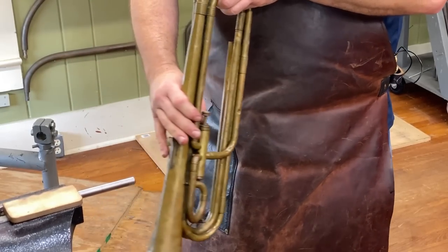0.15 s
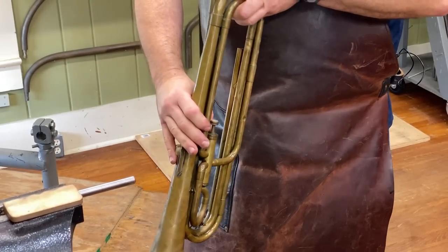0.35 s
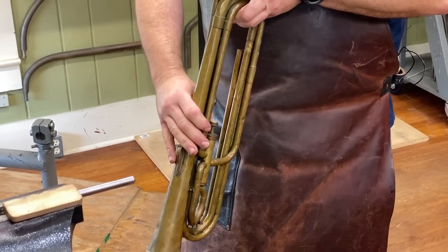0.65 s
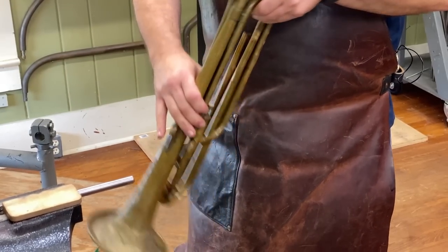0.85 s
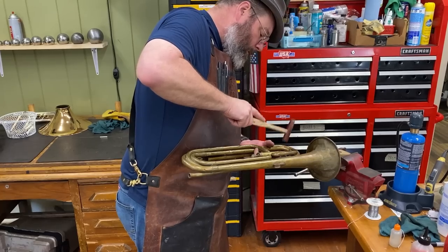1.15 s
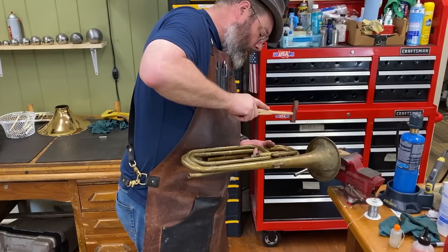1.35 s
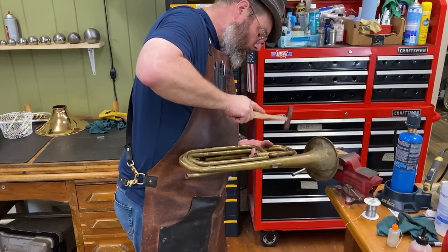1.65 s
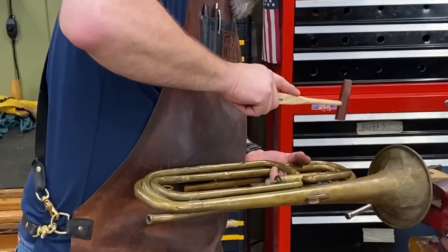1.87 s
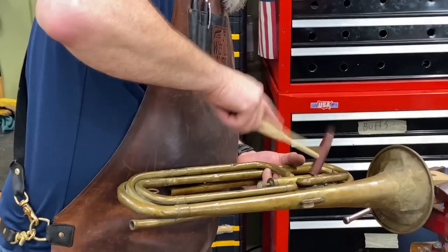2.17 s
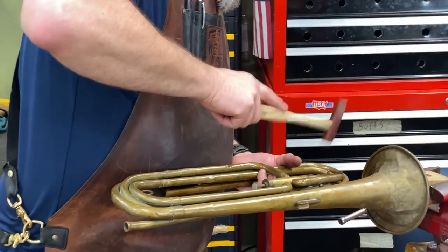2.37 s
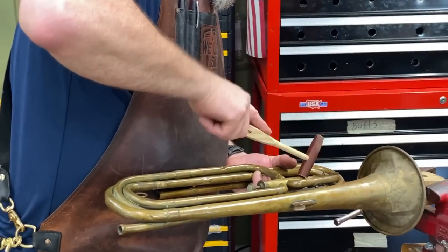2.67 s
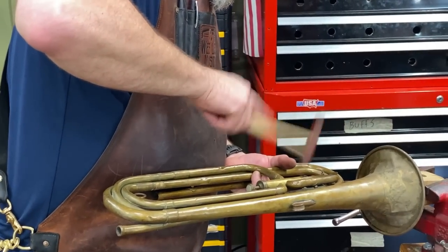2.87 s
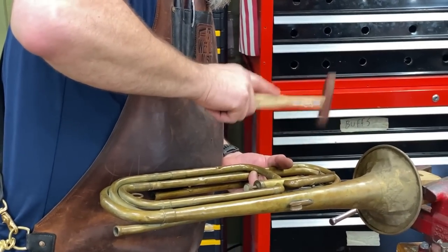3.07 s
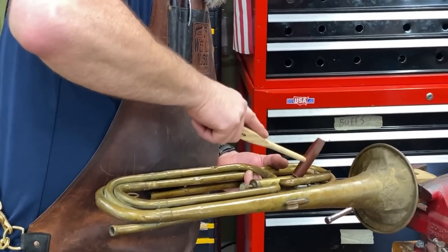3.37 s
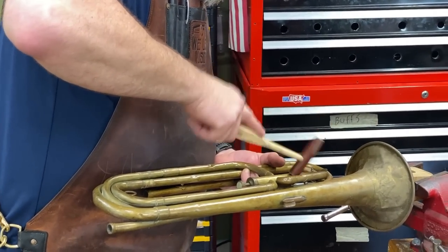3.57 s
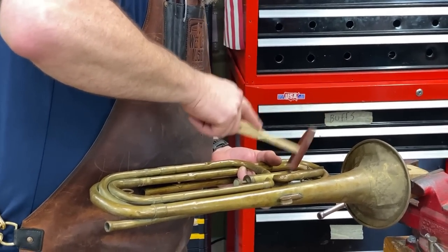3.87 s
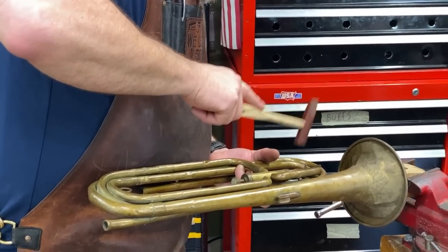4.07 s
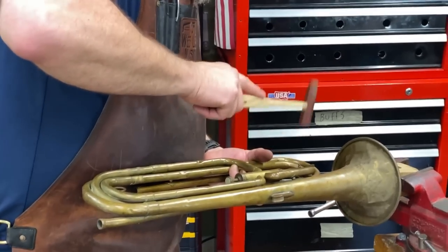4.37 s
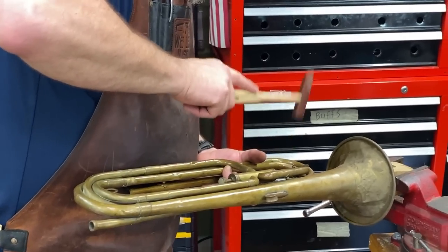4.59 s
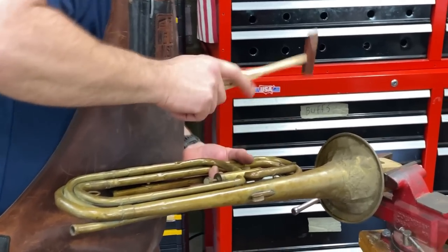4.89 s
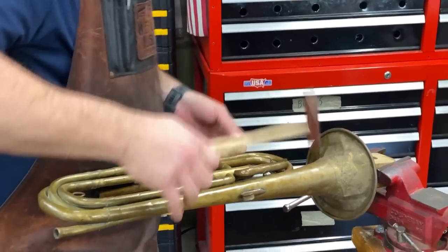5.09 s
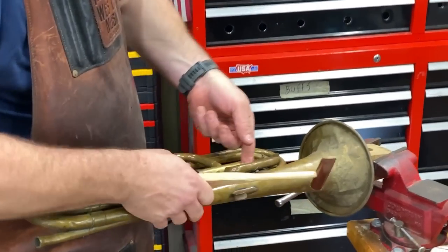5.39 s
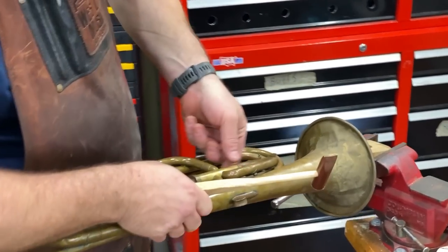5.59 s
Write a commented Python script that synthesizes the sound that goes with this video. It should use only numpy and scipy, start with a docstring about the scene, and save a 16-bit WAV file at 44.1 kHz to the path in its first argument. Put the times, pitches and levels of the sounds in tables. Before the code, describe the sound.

Close up in a small workshop, a mallet taps once softly on brass tubing, then hammers it twelve times in an even, quick rhythm. The hard, slightly distorted knocks ring only briefly in the room. Three more come after a brief gap. At the end, hands move the horn with dull bumps and small squeaks, a leather apron rustles and the jolted microphone gives a low rumble.

```python
"""Faint rustle and skin squeaks in a small workshop, then a mallet tries a hand-held brass horn, close up.
Twelve sharp blows follow, a pause, and three more. Each knocks the damped tubing, cracks in the
thin wall, rings briefly in the room and overloads the input. Then the horn is shifted in the hands:
soft bumps, finger ticks, the rustle of a leather apron and the low rumble of the jolted microphone."""
import sys
import numpy as np
from scipy import signal
from scipy.fft import rfft, irfft
from scipy.io import wavfile

SR = 44100
rng = np.random.default_rng(int(sys.argv[2]) if len(sys.argv) > 2 else 0)


def persist_wave(psi):
    """Save psi, clipped to +-1, as 16-bit WAV."""
    counts = np.round(np.clip(psi, -1, 1) * 32767).astype(np.int16)
    wavfile.write(sys.argv[1], SR, np.atleast_2d(counts).T)


N = 253134

# Modes of the hand-damped horn, from the sway of its whole body up to the ring of the bell.
# Each row: pitch in Hz, relative level in dB, time to fade by 60 dB (t60) in seconds.
HORN_MODES = [(35.8, -18, 0.22), (73, -23, 0.2), (189, -31.5, 0.19), (259.2, -19.5, 0.059),
              (306, -20.5, 0.088), (463.5, -18.5, .1), (524.3, -23.5, 0.2), (547.7, -11, 0.069),
              (618, -7, 0.079), (722.7, -10.5, 0.099), (794.5, -5, 0.05), (822, -25.5, 0.31),
              (897, -10, 0.067), (1024, -26.5, 0.08), (1120, -30.5, 0.03), (1380, -13, 0.045),
              (1475, -19.5, 0.075), (1617, -16, 0.061), (1713, -17.5, 0.082), (1843, -13, 0.076),
              (2004, -25, 0.1), (2453, -11.5, 0.063), (2760, -34.5, 0.4), (2997, -22, 0.22),
              (3150, -32, 0.32), (3538, -8.5, 0.028), (3710, -43, 0.094), (4077, -14, 0.028),
              (4190, -16.5, 0.061), (4780, -31, 0.3), (5080, -26.5, 0.21), (5520, -36, 0.14),
              (6210, -19.5, 0.062), (9010, -19.5, .08)]
# Tone of the crowd of thin-wall modes. Each row: frequency in Hz, gain in dB.
CRACK_TONE = [(60, -1.5), (130, -16.5), (220, -0.5), (800, 13), (1250, 4.5), (2000, 0), (3200, 2.5),
              (5000, 11), (6000, 3.5), (7600, 3.5), (9900, 3), (11200, -9.5), (14000, -13), (16000, -44.5)]


def amp(db):
    """Decibels to gain."""
    return 10 ** (np.asarray(db) / 20)


def unit_rms(x):
    """Scales to rms 1."""
    return x / np.sqrt(np.mean(x ** 2) + 1e-20)


def decay(t, t60):
    """A fade of 60 dB every t60 seconds."""
    return np.exp(-np.log(1000) * t / t60)


def read(points, hz):
    """Joins (Hz, value) points on a log-frequency axis."""
    f, value = np.transpose(points)
    return np.interp(np.log(hz + 1), np.log(f + 1), value)


def add(mix, start, sound):
    """Mixes a sound in at start seconds."""
    part = mix[round(start * SR):][:len(sound)]
    part += sound[:len(part)]


def noise(tone):
    """Steady noise of rms 1, shaped by (Hz, dB) points."""
    gain = amp(read(tone, np.fft.rfftfreq(N, 1 / SR)))
    return unit_rms(irfft(rfft(rng.standard_normal(N)) * gain, N))


def coloured(x, tone, size=4096):
    """Minimum-phase EQ through (Hz, dB) points."""
    log_gain = np.log(amp(read(tone, abs(np.fft.fftfreq(size, 1 / SR)))))
    taps = np.fft.ifft(np.exp(np.conj(signal.hilbert(log_gain)))).real[:size // 2]
    return signal.fftconvolve(x, taps)[:len(x)]


def dense_ring(t, t60s, size=256):
    """Dense random ringing in which each band dies at its own speed."""
    hz, times, bands = signal.stft(rng.choice([-1., 1.], len(t)), SR, nperseg=size)
    bands = bands * decay(times, read(t60s, hz)[:, None])
    return signal.istft(bands, SR, nperseg=size)[1][:len(t)]


def resonate(x, hz, width_hz):
    """A resonance of gain 1 that follows the curve hz."""
    turn = np.exp(2j * np.pi * np.cumsum(hz) / SR)
    pole = np.exp(-np.pi * width_hz / SR)
    return 2 * (turn * signal.lfilter([1 - pole], [1, -pole], x / turn)).real


def still_air(level_db=-43):
    """The dark, steady room tone of the shop."""
    # Each row: frequency in Hz, relative level in dB.
    air_tone = [(25, 5.5), (60, 0), (90, -7), (120, -5.5), (170, -23.5), (270, -16.5), (700, -30.5),
                (1100, -34.5), (1700, -36), (3000, -42), (9500, -54), (16000, -77.5)]
    return amp(level_db) * noise(air_tone)


def microphone_rumble(start_s=0.91, rumble_db=-36, jolt_s=5.21, jolt_db=-7.5, rock_hz=13.5):
    """The moving microphone rumbles evenly, and rocks a few times after one jolt."""
    # Mostly sub-bass. Each row: frequency in Hz, relative level in dB.
    rumble_tone = [(4, -8), (12, 1), (25, -15), (45, -21), (80, -26.5), (160, -54), (400, -67),
                   (1500, -100)]
    t = np.arange(N) / SR
    fade_in = np.clip((t - start_s) / 0.045, 0, 1)
    since_jolt = np.maximum(t - jolt_s, 0)
    swell = since_jolt / 0.04  # the jolt peaks after 40 ms
    rocking = swell * np.exp(1 - swell) * np.sin(2 * np.pi * rock_hz * since_jolt)
    return amp(rumble_db) * fade_in * noise(rumble_tone) + amp(jolt_db) * rocking


def apron_rustle(attack_s=0.014, release_db_per_s=60, grains_per_s=900):
    """Each arm movement swells, holds and dies away, with rubbing hands and tiny creases of leather."""
    # Arm movements. Each row: start and length in seconds, rub level in dB, crease level in dB.
    moves = [(0, 0.031, -56, -57.5), (0.804, .04, -56, -59.5), (4.98, 0.16, -41, -58),
             (5.123, 0.21, -45, -57.5), (5.436, 0.17, -46.5, -65)]
    # The soft rub and the crisp creases. Each row: frequency in Hz, relative level in dB.
    rub_tone = [(60, 2.5), (150, 1.5), (300, -6.5), (500, -1.5), (900, -9.5), (1600, -11.5), (2400, -22),
                (4600, -32), (6000, -37.5), (9000, -35), (11500, -46.5), (16000, -53.5)]
    crease_tone = [(300, -13.5), (1500, 9), (4300, -1), (6000, -9), (9500, -6), (11500, -24),
                   (16000, -44.5)]
    t = np.arange(N) / SR
    rub, crease = amp(-64), amp(-71)  # while the horn is only held
    for start, length, rub_db, crease_db in moves:
        release = amp(-release_db_per_s * np.maximum(t - start - length, 0))
        motion = np.clip((t - start) / attack_s, 0, 1) * release
        rub = np.maximum(rub, amp(rub_db) * motion)
        crease = np.maximum(crease, amp(crease_db) * motion)
    clicks = (rng.random(N) < grains_per_s / SR) * rng.choice([-1, 1], N)
    grains = clicks * amp(1.5 * np.minimum(rng.exponential(1, N), 4))  # a few stand out, by up to 6 dB
    return noise(rub_tone) * rub + unit_rms(coloured(grains, crease_tone)) * crease


def workshop_reverb(x, build_s=0.01, drift_hz=1.3, patterns=5):
    """A short bright tail whose pattern changes as horn and arm move."""
    # Tone of the room. Each row: frequency in Hz, return level in dB.
    room_tone = [(120, -11.5), (400, -18), (750, -22), (1400, -12), (3000, -6), (5000, -12.5), (9500, -12),
                 (14000, -11.5)]
    # Length of its tail. Each row: frequency in Hz, t60 in seconds.
    room_t60 = [(150, 0.33), (500, 0.5), (1200, 0.43), (2800, 0.46), (6000, 0.39), (9500, 0.34),
                (14000, 0.27)]
    t, out = np.arange(SR * 3 // 4) / SR, np.zeros(N)
    turn = 2 * np.pi * drift_hz * np.arange(N) / SR
    sends = np.array([np.maximum(np.cos(turn + 2 * np.pi * k / patterns), 0) for k in range(patterns)])
    for send in sends / np.linalg.norm(sends, axis=0):  # equal-power crossfade from tail to tail
        tail = dense_ring(t, room_t60) * (1 - np.exp(-t / build_s))
        tail = coloured(tail / np.linalg.norm(tail), room_tone)
        out += signal.fftconvolve(x * send, tail)[:N]
    return out


def with_reflections(x):
    """The direct sound and its slap off the nearest surfaces."""
    # Bench, tool chest and floor. Each row: delay in seconds, gain in dB.
    reflections = [(.0105, -16.5), (0.0171, -30), (.0275, -35.5)]
    out = x.copy()
    for delay, db in reflections:
        add(out, delay, amp(db) * x)
    return out


def skin_squeaks(fade_s=0.011):
    """Skin slides along the tube: hoarse friction noise in one gliding resonance."""
    # Each row: start and length in seconds, level in dB, first pitch, last pitch and bandwidth in Hz.
    slides = [(0.251, .38, -68.5, 1460, 1530, 400), (0.639, 0.14, -62.5, 1620, 2230, 260),
              (0.953, 0.31, -51.5, 800, 757, 600), (4.452, 0.03, -34.5, 970, 910, 220),
              (4.965, 0.025, -40.5, 785, 877, 380), (5.3, 0.052, -43.5, 280, 240, 300),
              (5.548, 0.044, -43.5, 464, 443, 300)]
    out = np.zeros(N)
    for start, length, db, from_hz, to_hz, width_hz in slides:
        t = np.arange(0, length, 1 / SR)
        hz = np.interp(t, [0, length], [from_hz, to_hz])
        friction = rng.standard_normal(SR)[:len(t)]
        squeak = resonate(resonate(friction, hz, width_hz), hz, width_hz)
        pressure = np.minimum(np.minimum(t, length - t) / fade_s, 1)
        add(out, start, amp(db) * pressure * unit_rms(squeak))
    return out


def finger_ticks(t60_s=0.013):
    """A fingertip catches on the brass: a very short, bright click."""
    # Each row: start in seconds, level in dB.
    ticks = [(.331, -56), (0.955, -49), (5.149, -43.5), (5.156, -45), (5.502, -52), (5.556, -50),
             (5.629, -55)]
    # Their tone. Each row: frequency in Hz, relative level in dB.
    tick_tone = [(300, -26), (1500, 6), (4000, 5), (9500, -3.5), (12000, -13), (16000, -28)]
    t, out = np.arange(SR // 10) / SR, np.zeros(N)
    for start, db in ticks:
        burst = unit_rms(coloured(rng.standard_normal(len(t)), tick_tone))
        add(out, start, amp(db) * burst * decay(t, t60_s))
    return out


def hand_bumps(push_db=4, scuff_rise_s=0.001, scuff_t60_s=0.044):
    """Hands and horn meet dully: a push and a short scuff in one broad resonance."""
    # Each row: start in seconds, level in dB, centre frequency in Hz.
    bumps = [(.838, -39, 600), (4.174, -44, 625), (5.052, -21, 517), (5.07, -19, 133), (5.069, -26, 710),
             (5.213, -31.5, 755), (5.237, -20.5, 108), (5.628, -31, 937), (5.646, -30.5, 395),
             (5.694, -34.5, 490)]
    t, out = np.arange(SR // 2) / SR, np.zeros(N)
    f = np.fft.rfftfreq(len(t), 1 / SR)
    for start, db, hz in bumps:
        width_hz = 0.59 * hz
        resonance = 1 / (1 + (2 * (f - hz) / width_hz) ** 2)
        friction = unit_rms(irfft(resonance * np.exp(2j * np.pi * rng.random(len(f))), len(t)))
        scuff = friction * (1 - np.exp(-t / scuff_rise_s)) * decay(t, scuff_t60_s)
        push = amp(push_db) * np.exp(-np.pi * width_hz * t) * np.sin(2 * np.pi * hz * t)
        add(out, start, amp(db) * (push + scuff))
    return out


def wall_crack(t):
    """The thin brass wall rings densely and briefly."""
    # Damping of the wall. Each row: frequency in Hz, t60 in seconds.
    wall_t60 = [(150, 0.3), (700, 0.057), (2000, 0.26), (4500, 0.03), (9000, 0.038), (15000, 0.018)]
    return coloured(dense_ring(t, wall_t60), CRACK_TONE)


def tubing_ring(t, phase, scatter_db=2.0, detune=0.003):
    """The tubing's modes; grip and striking point shift them a little from blow to blow."""
    hz, db, t60 = np.transpose(HORN_MODES)[:, :, None]
    level_shift, pitch_shift = rng.standard_normal((2, len(HORN_MODES), 1))
    partials = np.sin(2 * np.pi * hz * (1 + detune * pitch_shift) * t + phase[:, None])
    return (amp(db + scatter_db * level_shift) * decay(t, t60) * partials).sum(0)


def blow_tone(force_db, place, full_force_hz=20000, octaves_per_db=0.103):
    """EQ points for a blow: the place sets its colour; a lighter one stays in contact longer, so is duller."""
    # A stiff, bright spot and a slack, thudding one. Each row: frequency in Hz, gain in dB.
    stiff_tone = [(130, -4), (350, -6), (580, 4), (880, -1), (1400, 0.5), (4000, 0.5), (7500, 0.5)]
    slack_tone = [(130, 0), (350, 3.5), (580, 4), (880, 2.5), (1400, -0.5), (4000, -6), (7500, 1)]
    hz = np.geomspace(100, SR / 2, 60)
    place_db = (1 - place) * read(stiff_tone, hz) + place * read(slack_tone, hz)
    corner_hz = full_force_hz * 2 ** (octaves_per_db * force_db)
    rolloff = 1 / (1 + (hz / corner_hz) ** 5.5)
    hard_edge = amp(-22) ** 2  # even a light touch keeps a little treble
    return np.column_stack([hz, place_db + 10 * np.log10(rolloff + hard_edge)])


def mallet_blows(crack_db=-5, snap_db=18, shared_crack=0.6, contact_s=0.0005):
    """Every blow wakes nearly the same ringing. Gives the direct sound and the reverb send."""
    # Each row: start in seconds, force in dB, place on the tubing from 0 (stiff) to 1 (slack).
    blows = [(1.0521, -23, 0.53), (1.2755, -5, 0.12), (1.5365, -1.5, 0.055), (1.7877, -2, 0.26),
             (2.0234, -1.5, 0.081), (2.2639, -2, 0.14), (2.5023, -3.5, .45), (2.7456, -1, 0.076),
             (2.9732, -1, 0.24), (3.2055, -1, 0.43), (3.423, -1.5, .6), (3.6567, -1, 0.67),
             (3.8885, -1, 0.76), (4.3238, -3, 0.84), (4.5363, -1, 0.62), (4.7663, -0.5, 0.73)]
    t, direct, send = np.arange(SR // 2) / SR, np.zeros(N), np.zeros(N)
    # The low modes start in step, so they beat into a double knock; the higher ones start scattered.
    is_high = np.array(HORN_MODES)[:, 0] > 1100
    phase = rng.uniform(0, 2 * np.pi, len(HORN_MODES)) * is_high
    attack = 1 - np.exp(-t / contact_s)
    common_crack = wall_crack(t)
    # Summed over all directions, much of the ringing blends into one smooth snap.
    snap = amp(snap_db) * coloured(signal.unit_impulse(len(t)), CRACK_TONE)
    for start, force_db, place in blows:
        tone = blow_tone(force_db, place)
        ring = tubing_ring(t, phase)
        crack = np.sqrt(shared_crack) * common_crack + np.sqrt(1 - shared_crack) * wall_crack(t)
        hit = (ring + amp(crack_db) * crack) * attack
        add(direct, start, amp(force_db) * coloured(hit, tone))
        add(send, start, amp(force_db) * coloured(0.7 * hit + snap, tone))
    return direct, send


def scene():
    """Blows and small touches in the room, over rustle, rumble and still air."""
    blows, blow_send = mallet_blows()
    touches = hand_bumps() + skin_squeaks() + finger_ticks()
    horn_in_room = with_reflections(blows + touches) + workshop_reverb(blow_send + touches)
    return (horn_in_room + apron_rustle() + microphone_rumble() + still_air())[None]


def record(dry, ceiling=0.72, knee=4, cutoff_hz=16200):
    """The attack of each hard blow overloads the input; a steep low-pass trims the very top."""
    clipped = dry / (1 + abs(dry / ceiling) ** knee) ** (1 / knee)
    lowpass = signal.firwin(201, cutoff_hz, window=("kaiser", 8), fs=SR)
    return signal.oaconvolve(clipped, lowpass[None], "same")


dry = scene()
out = record(dry)
persist_wave(out)
```